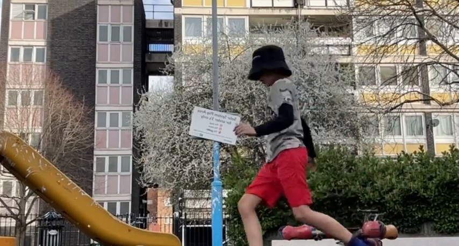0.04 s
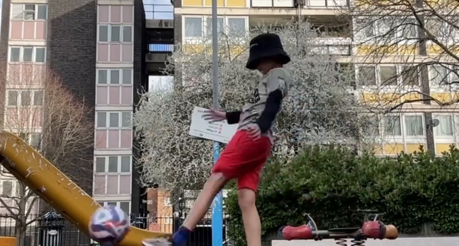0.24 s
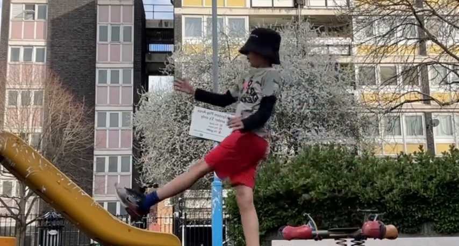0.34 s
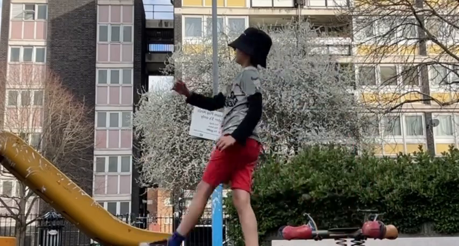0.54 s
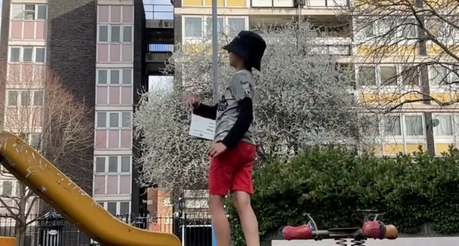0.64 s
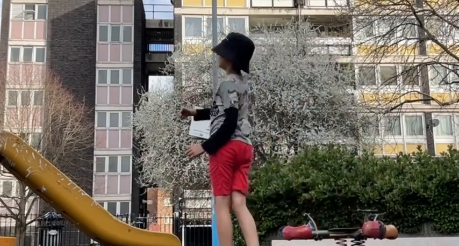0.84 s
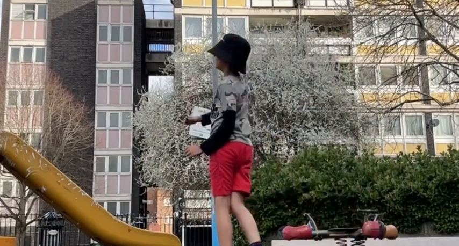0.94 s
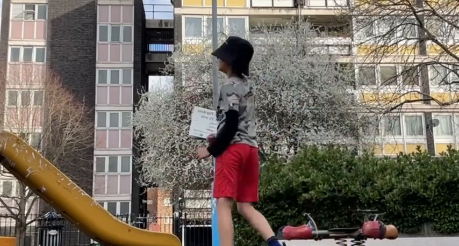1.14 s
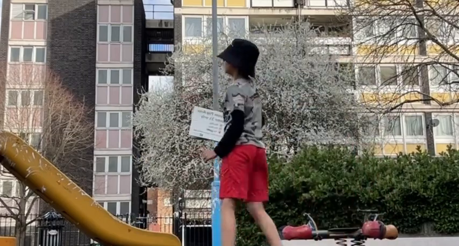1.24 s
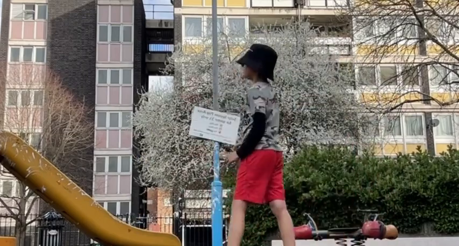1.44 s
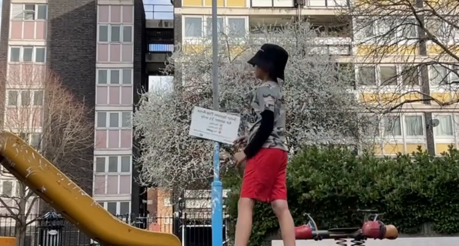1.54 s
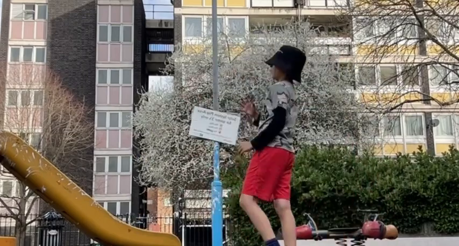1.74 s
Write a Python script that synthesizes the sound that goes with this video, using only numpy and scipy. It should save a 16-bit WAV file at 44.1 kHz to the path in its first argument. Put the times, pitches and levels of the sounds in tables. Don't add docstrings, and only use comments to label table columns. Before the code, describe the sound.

A ball kick dominates: soft steps thud at 0.05-0.1 seconds, a shoe scrapes grit at 0.2, then a loud hollow slap and deep boom strike at 0.23-0.26, with dull echoes off buildings. Light footfalls follow, with a scuff and knock at 0.7, faint clicks at 0.93, far bounces at 1.05-1.1, 1.4 and 1.6, and tiny ticks near 1.75, over quiet city hum.

```python
import sys
import numpy as np
from scipy import signal
from scipy.fft import rfft, irfft, next_fast_len
from scipy.io import wavfile
from scipy.ndimage import uniform_filter1d

SR = 44100
rng = np.random.default_rng(int(sys.argv[2]) if len(sys.argv) > 2 else 0)


def unload_wav(signal):
    wavfile.write(
        sys.argv[1],
        SR,
        np.round(np.clip(np.atleast_2d(signal).T, -1, 1) * 32767).astype(np.int16),
    )


def nominal_scale(level):
    x = np.asarray(level, float) / 20
    return 10 ** x


N = 79380
T = np.arange(N) / SR
M = next_fast_len(N + 8192)
HZ = np.fft.rfftfreq(M, 1 / SR)
TREBLE_HZ = 3350
# (frequency [Hz], level [dB])
RATTLE_COLOUR = [(150, -29), (500, 5), (900, 3.5), (1500, 1), (3800, -4), (5200, -15), (7500, -27),
                 (16300, -41)]


def unit(x):
    return x / np.sqrt(np.mean(x ** 2) + 1e-20)


def along(points, hz=HZ):
    f, v = np.transpose(points)
    return np.interp(np.log(hz + 1), np.log(f + 1), v)


def causal(db):
    c = irfft(db * np.log(10) / 20, M)
    c[1:M // 2] *= 2
    c[M // 2 + 1:] = 0
    return np.exp(rfft(c))


def filtered(x, response):
    return irfft(rfft(x, M) * response, M)[..., :N]


def coloured(x, spectrum):
    h = causal(along(spectrum))
    return filtered(x, h / np.sqrt(np.mean(abs(h) ** 2)))


def split(x, hz):
    low = filtered(x, 1 / (1 + (HZ / hz) ** 4))
    return low, x - low


def ring(start, hz, db, t60, turn=0.):
    t = np.maximum(T - start, 0)
    tone = np.sin(2 * np.pi * hz * t + turn)
    return nominal_scale(db - 60 * t / t60) * tone * (1 - np.exp(-t / 0.00043))


def swell(loudest, crest, db, hz, half, sag_hz):
    t = T - crest
    envelope = np.exp(-.5 * ((T - loudest) / half) ** 2)
    return nominal_scale(db) * envelope * np.cos(2 * np.pi * (hz - .5 * sag_hz * t) * t)


def ports(mid, side, table, turn, ripple_db=0.):
    u = np.arctan(nominal_scale(along(table)))
    m = filtered(mid, np.cos(u) * causal(ripple_db + 0 * HZ))
    s = filtered(side, np.sin(u) * np.exp(1j * along(turn)))
    return np.array([m + s, m - s])


def hum():
    # (time [s], level [dB])
    hum_level = [(0.0, -48), (0.17, -47.5), (0.375, -41.5), (0.57, -48), (0.738, -44), (0.886, -47),
                 (1.228, -47), (1.548, -47.5), (1.8, -48)]
    # (frequency [Hz], level [dB])
    hum_colour = [(30, -5.5), (60, 0.5), (110, -3.5), (400, -15.5), (1200, -22.5), (3000, -31.5),
                  (7000, -43), (15500, -52.5)]
    over_db, patchy_db = 5, 2.5
    rumble_hz, rumble_dip_db, rumble_in_s = 400, -11.5, .038
    z = signal.stft(rng.standard_normal((2, N)), nperseg=1024)[2]
    field = uniform_filter1d(rng.standard_normal(z.shape[1:]), size=12, axis=0)
    field = uniform_filter1d(field, size=5, axis=1)
    pair = signal.istft(z * nominal_scale(patchy_db * unit(field)), nperseg=1024)[1][:, :N]
    s, db = np.transpose(hum_level)
    city = unit(filtered(pair, nominal_scale(along(hum_colour)) * (HZ < 16300)))
    low, high = split(city, rumble_hz)
    dip = nominal_scale(rumble_dip_db * (T < rumble_in_s))
    return nominal_scale(np.interp(T, s, db) + over_db) * (high + low * dip)


def flats(x):
    # (delay [s], level [dB])
    echoes = [
        (0.074, -28.5),
        (.103, -28),
        (0.146, -33),
        (0.195, -35),
        (0.213, -32),
        (0.288, -63),
    ]
    # (frequency [Hz], time to fall 60 dB [s])
    yard = [(70, 1.4), (400, 0.62), (1500, 1.01), (6000, 0.77)]
    yard_db, tail_hz, tail_rise_s = -31.5, 1500, .07
    smear_s, echo_hz = .03, 685
    t_room = T[:SR]
    hz, t, z = signal.stft(rng.standard_normal((2, SR)), SR, nperseg=1024)
    decay = nominal_scale(-60 * t / along(yard, hz)[:, None])
    tail = signal.istft(z * decay, SR, nperseg=1024)[1][:, :SR]
    tail = nominal_scale(yard_db) * tail / np.linalg.norm(tail[0]) * np.clip(t_room / tail_rise_s, 0, 1) ** 2
    tail = filtered(tail, 1 / (1 + 1j * HZ / tail_hz))[:, :SR]
    gate = sum(nominal_scale(db - 60 * np.maximum(t_room - s, 0) / smear_s) * (t_room > s) for s, db in echoes)
    walls = gate * rng.standard_normal((2, SR)) / np.sqrt(smear_s * SR / 14)
    walls = filtered(walls, 1j * HZ / (1j * HZ + 200) / (1 + 1j * HZ / echo_hz))[:, :SR]
    return signal.fftconvolve(x[None], tail + walls, axes=1)[:, :N]


def rustles():
    # (start [s], length [s], level [dB])
    brushes = [(.352, .02, -63), (.775, .055, -64), (.87, .08, -68), (.918, .008, -61), (1.11, .015, -61),
               (1.125, .07, -66), (1.258, .008, -62), (1.371, .008, -61), (1.385, .15, -68),
               (1.59, .08, -68), (1.67, .008, -63), (1.725, .008, -62)]
    # (frequency [Hz], level [dB])
    cloth = [(2000, -20), (5000, -8), (6800, -1), (9500, -9), (13500, 0), (16000, -4)]
    env = sum(nominal_scale(db) * np.sin(np.pi * np.clip((T - s) / n, 0, 1)) ** .5 for s, n, db in brushes)
    flutter = nominal_scale(2.0 * unit(uniform_filter1d(rng.standard_normal(N), size=300)))
    return coloured(env * flutter * rng.standard_normal(N), cloth)


def ticks():
    # (time [s], level [dB])
    clicks = [(0.93, -32.5), (.946, -33.5), (1.541, -44), (1.706, -42), (1.72, -43), (1.735, -40),
              (1.75, -44), (1.769, -44), (1.781, -45), (1.79, -45)]
    # (frequency [Hz], level [dB], time to fall 60 dB [s])
    click_modes = [(3140, -4, 0.024), (3630, 0, 0.01), (4550, -10.5, 0.011)]
    return sum(ring(s, hz * (1 + 0.012 * rng.standard_normal()), db + g, d)
               for s, db in clicks for hz, g, d in click_modes)


def bounces():
    # (time [s], level [dB], rattle time to fall 60 dB [s], body over rattle [dB], treble [dB])
    landings = [
        (1.05, -30.5, 0.053, 9.5, 1.5),
        (1.076, -50, 0.9, -20, 3.5),
        (1.11, -39.5, 0.075, 0.5, 0),
        (1.406, -38.5, 0.028, -3, -7),
        (1.428, -53, 0.025, -15, 3),
        (1.589, -38, 0.031, -4, -7),
    ]
    # (frequency [Hz], level [dB], time to fall 60 dB [s])
    body = [(345, 2, 0.018), (553, -5.5, 0.024), (1230, 5.5, 0.027), (1430, 4.5, 0.014), (1753, -7, 0.082)]
    strike_s, hold_s = .0006, .011
    body_lag_s = 0.0055
    first_db, first_t60 = 3.5, 0.013
    out, rattle = np.zeros(N), np.zeros(N)
    low, high = split(rng.standard_normal(N), TREBLE_HZ)
    for s, db, t60, body_db, treble_db in landings:
        t = np.maximum(T - s, 0)
        env = nominal_scale(db - 60 * np.maximum(t - hold_s, 0) / t60) + nominal_scale(db + first_db - 60 * t / first_t60)
        rattle += env * (1 - np.exp(-t / strike_s)) * (low + nominal_scale(treble_db) * high)
        luck = rng.standard_normal(len(body))
        out += sum(ring(s + body_lag_s, hz, db + body_db + g + 2 * k, d)
                   for (hz, g, d), k in zip(body, luck))
    return out + coloured(rattle, RATTLE_COLOUR)


def puffs():
    # (time [s], level [dB], time to fall 60 dB [s])
    contacts = [(0.038, -37, 0.21), (0.075, -33, 0.038), (1.59, -37, 0.078), (0.703, -33.5, 0.11),
                (.96, -45, 0.14), (.41, -41, 0.37), (0.526, -42, 0.12), (0.599, -39, 0.064),
                (1.068, -34, 0.044), (1.113, -30.5, 0.088), (1.158, -32.5, 0.063), (1.362, -39.5, 0.1),
                (1.409, -32, 0.067), (1.697, -38.5, 0.34)]
    # (frequency [Hz], level [dB])
    puff_colour = [(50, -43), (110, -4.5), (300, -3.5), (600, -17.5), (1500, -28.5), (16000, -59)]
    env = sum(nominal_scale(db - 60 * np.maximum(T - s, 0) / t60) * np.clip((T - s) / 0.003, 0, 1)
              for s, db, t60 in contacts)
    return env * unit(coloured(rng.standard_normal(N), puff_colour))


def thuds():
    # (crest [s], level [dB], frequency [Hz], half length [s], sag [Hz/s])
    landings = [(0.046, -32.5, 75, 0.0062, 10.5), (0.062, -30, 75, 0.0077, 5), (0.0785, -24, 138, 0.006, 0),
                (0.119, -36, 60.5, 0.0064, 12), (0.353, -27, 76, 0.00604, 2),
                (0.439, -35.5, 68.2, 0.025, -5), (0.511, -31, 78.5, 0.0049, -2),
                (.532, -33, 165.7, 0.011, -2), (0.551, -29.5, 79.6, 0.022, -5),
                (0.592, -30, 91, 0.0049, -16), (0.695, -33, 60.2, 0.011, 20), (0.977, -37, 68, 0.016, -5),
                (0.779, -43, 69.3, 0.0098, 0.0045), (0.831, -40, 100.3, 0.012, 0.0052),
                (0.913, -40, 86, 0.0073, 1), (1.02, -44, 75.7, 0.011, 0.99), (1.08, -39.5, 114, 0.015, 0),
                (1.646, -29.5, 67, 0.0061, 0.012), (1.7207, -32, 118, 0.0077, 0)]
    # (loudest [s], crest [s], level [dB], frequency [Hz], half length [s], sag [Hz/s], start [s])
    kick_boom = (.2575, .2605, -4.4, 78, .0135, 400, .2335)
    boom = swell(*kick_boom[:-1]) * np.clip((T - kick_boom[-1]) / 0.0049, 0, 1)
    return boom + sum(swell(row[0], *row) for row in landings)


def scuffs():
    # (start [s], length [s], level [dB], swell to the end [dB], treble [dB])
    drags = [
        (0.192, 0.025, -28.5, -11.5, -4),
        (0.203, 0.02, -28, -5.5, 3),
        (0.669, 0.039, -40.5, 5, -13.5),
        (0.699, 0.019, -34, -11, -9.5),
        (0.715, 0.015, -35, -11, -13),
        (1.236, 0.067, -55.5, -3.5, -2.5),
        (1.691, 0.08, -54, -20, 0),
    ]
    # (frequency [Hz], level [dB])
    grit = [(200, -18), (480, 0), (1000, -5), (3000, -0.5), (5200, -8), (7500, -25), (14500, -37.5),
            (16300, -32)]
    grains_per_s, grain_db = 5200, 3
    grains = (rng.random(N) < grains_per_s / SR) * np.sign(rng.standard_normal(N))
    grains = grains * nominal_scale(grain_db * np.clip(rng.standard_normal(N), -2, 2))
    low, high = split(unit(unit(grains) + 0.82 * rng.standard_normal(N)), TREBLE_HZ)
    drag = np.zeros(N)
    for s, n, db, swell_db, treble_db in drags:
        level = nominal_scale(db + swell_db * np.clip((T - s) / n, 0, 1))
        edges = np.clip(np.minimum(T - s, s + n - T) / 0.0043, 0, 1)
        drag += level * edges * (low + nominal_scale(treble_db) * high)
    return coloured(drag, grit)


def kick():
    # (frequency [Hz], level [dB])
    slap_colour = [(400, -40), (1500, 1.5), (3000, 7), (4500, 0.5), (7000, -20), (10000, -30),
                   (15000, -3.5), (16300, -32)]
    # (start [s], frequency [Hz], level [dB], time to fall 60 dB [s])
    skin = [(.2361, 381, -21.5, 0.097), (.2335, 193, -7, 0.034), (0.22, 620, -21.5, 0.029),
            (0.22, 357, -20, 0.044), (.2305, 900, -14, 0.02), (.2308, 680, -17, 0.03),
            (.229, 1570, -13, 0.0091)]
    # (start [s], frequency [Hz], level [dB], time to fall
    # 60 dB [s])
    knocks = [(.299, 375, -32, .1), (.7043, 590, -25, .04), (.7085, 290, -36, .05), (.7048, 800, -34, .025),
              (.43, 500, -41, .08), (.2095, 550, -24, .02), (.216, 520, -25, .018), (.333, 560, -35, .03),
              (.6715, 1400, -38, .03), (.2515, 520, -25, .03), (.679, 300, -38, .12)]
    # (loudest [s], crest [s], level [dB], frequency [Hz], half length [s], sag [Hz/s])
    dent = (.2324, .2326, -1.2, 390, .0018, 36000)
    slap_s, slap_len_s, slap_db = .2285, 0.0014, -12.5
    spray_db, spray_t60 = -20, 0.16
    t = (T - slap_s) / slap_len_s
    shape = np.clip(t / 0.3, 0, 1) * nominal_scale(-14 * np.clip(t - 1, 0, 9))
    spray = (t > 0) * nominal_scale(spray_db - 60 * np.maximum(T - slap_s, 0) / spray_t60)
    slap = coloured(shape * rng.standard_normal(N), slap_colour)
    slap = slap + coloured(spray * rng.standard_normal(N), RATTLE_COLOUR)
    return nominal_scale(slap_db) * slap + swell(*dent) - sum(ring(*mode) for mode in [*skin, *knocks])


def scene():
    # (frequency [Hz], level [dB])
    near_side = [(60, -31), (300, -23.5), (700, -11.5), (1500, 11), (6000, 7), (7200, 13.5), (11500, 39),
                 (14500, 8)]
    # (frequency [Hz], turn [radians])
    near_turn = [(300, 1.0), (600, 1.9), (750, 3.5), (1200, 1.2), (1900, 2.5), (2800, 2.7), (4500, 2.75),
                 (6500, 1.7)]
    # (frequency [Hz], level [dB])
    far_side = [(60, -10), (250, -11), (700, -1.5), (2400, 7.5), (6200, 3), (7200, 15), (12000, 25),
                (14500, 19)]
    # (frequency [Hz], turn [radians])
    far_turn = [(400, 0.39), (1200, 0.97), (2200, 1.84), (4500, 2.26), (7000, 1.5)]
    # (frequency [Hz], width [Hz], level [dB])
    near_ripple = [(1690, 193, 15), (1862, 104, -14), (2235, 77, 7.5), (2720, 156, -22.5),
                   (2917, 267, 12.5), (3780, 290, 3.5), (4150, 38, -3.5), (4930, 167, 7.5)]
    ripple_db = sum(db * np.exp(-.5 * ((HZ - hz) / w) ** 2) for hz, w, db in near_ripple)
    near, far, low = kick() + scuffs(), bounces() + ticks(), thuds()
    wet = flats(near + far + low) + hum()
    near = near + low + puffs()
    far = far + rustles()
    heard = ports(near, near, near_side, near_turn, ripple_db)
    heard = heard + ports(far, far, far_side, far_turn)
    return heard + ports(*wet, far_side, far_turn)


def top_cut(x):
    return signal.sosfilt(signal.butter(12, 16480, fs=SR, output="sos"), x)


def record(dry):
    low_hz, top_hz, edge_hz = 40, 16100, 250
    ceiling, knee = 1., 7
    band = np.clip((top_hz - HZ) / edge_hz, 0, 1) ** 2 * HZ ** 4 / (HZ ** 4 + low_hz ** 4)
    squashed = dry / (1 + abs(dry / ceiling) ** knee) ** (1 / knee)
    mix = filtered(squashed, band)
    return top_cut(mix)


dry = scene()
out = record(dry)
unload_wav(out)
```